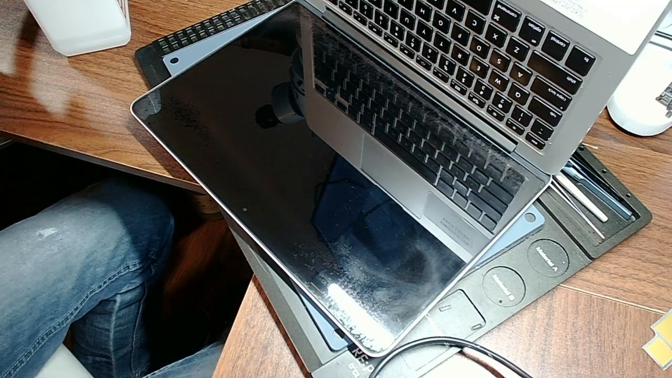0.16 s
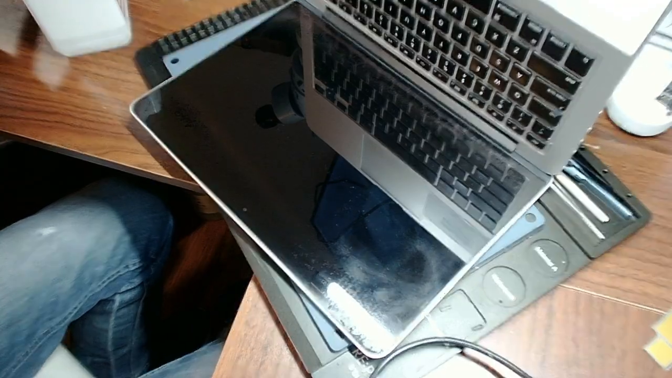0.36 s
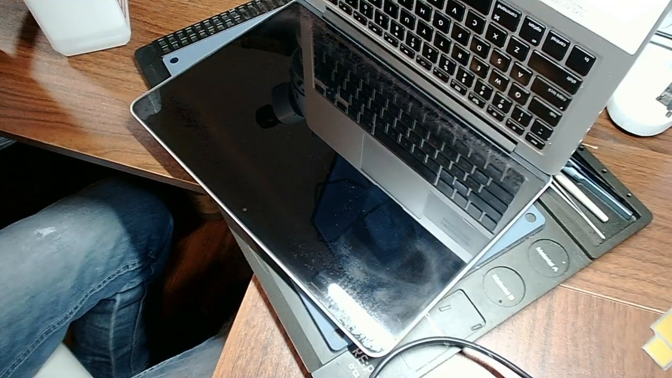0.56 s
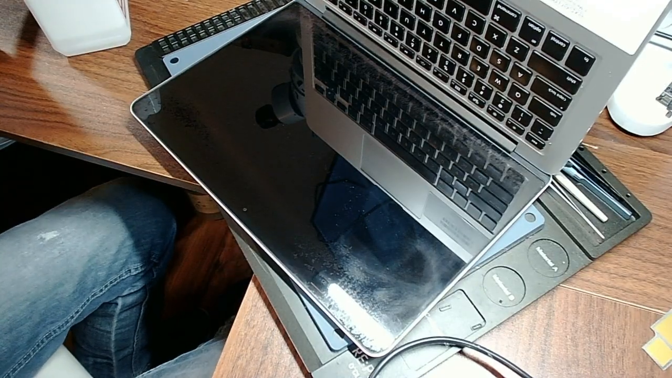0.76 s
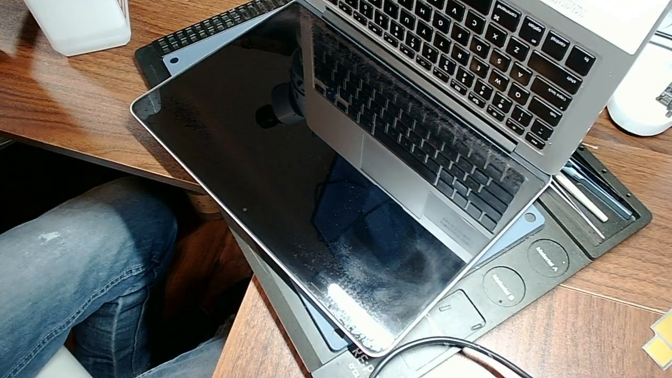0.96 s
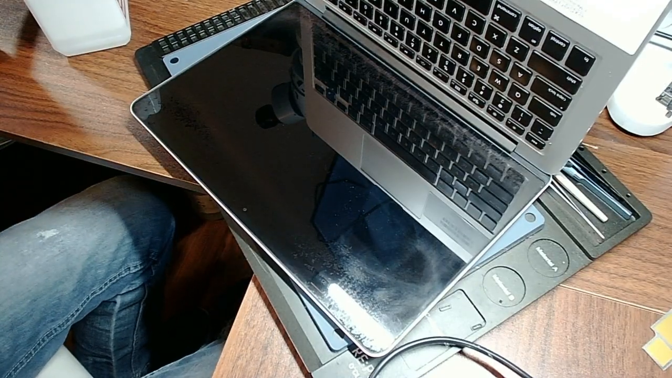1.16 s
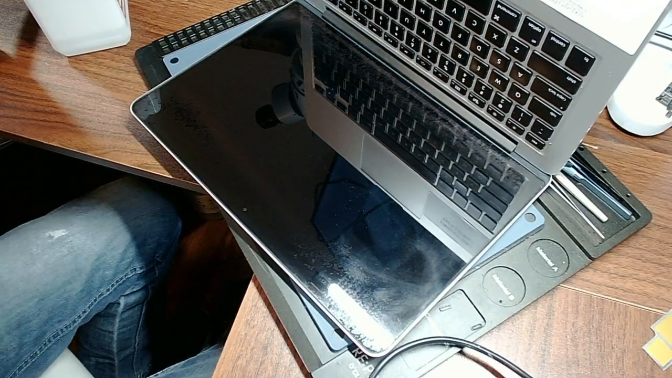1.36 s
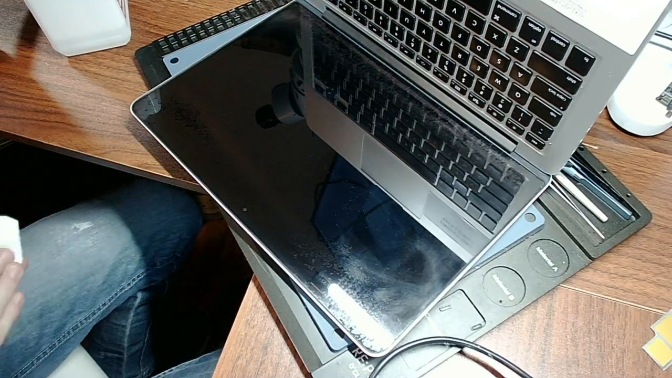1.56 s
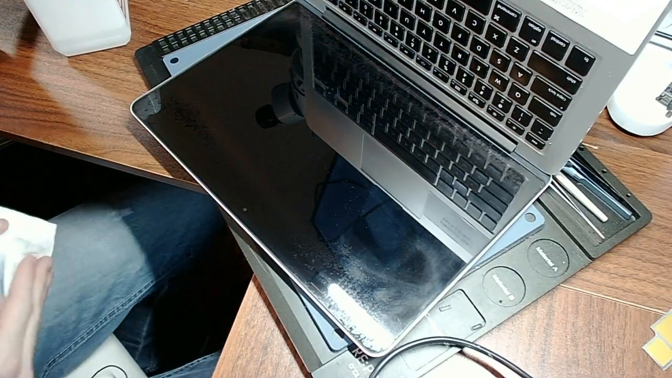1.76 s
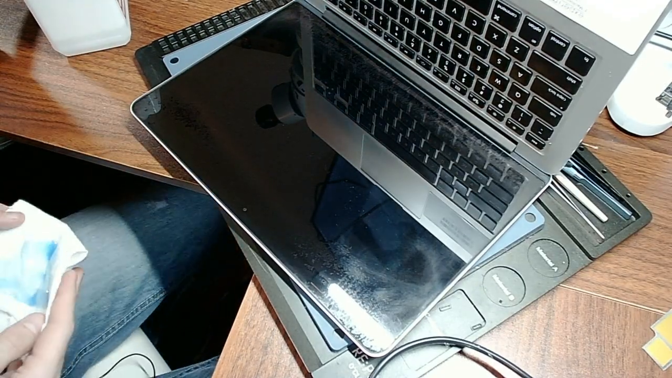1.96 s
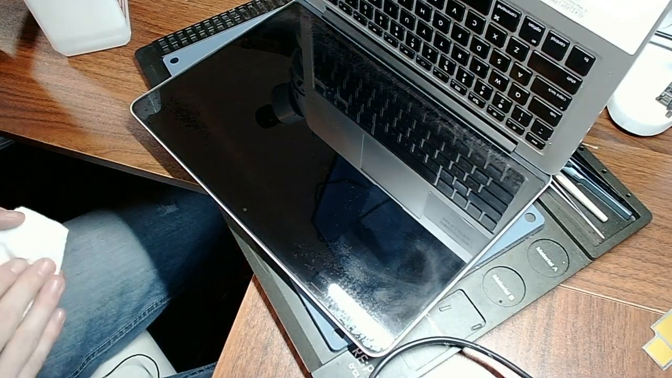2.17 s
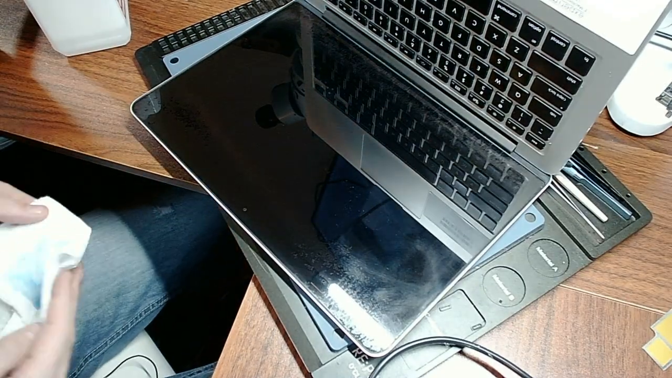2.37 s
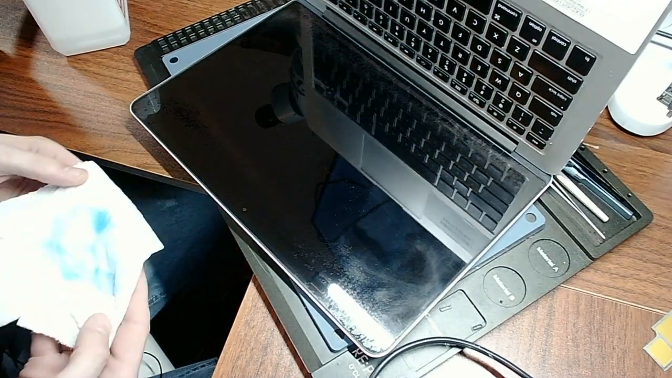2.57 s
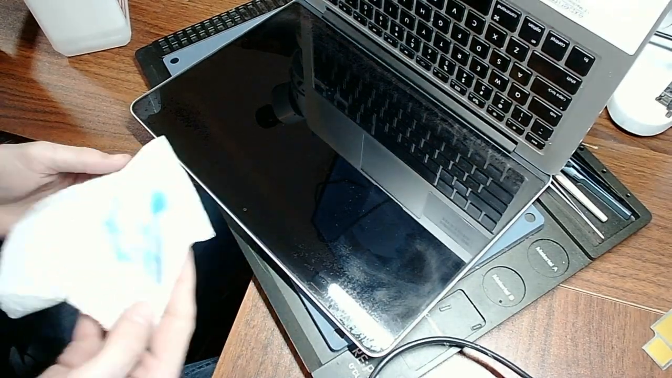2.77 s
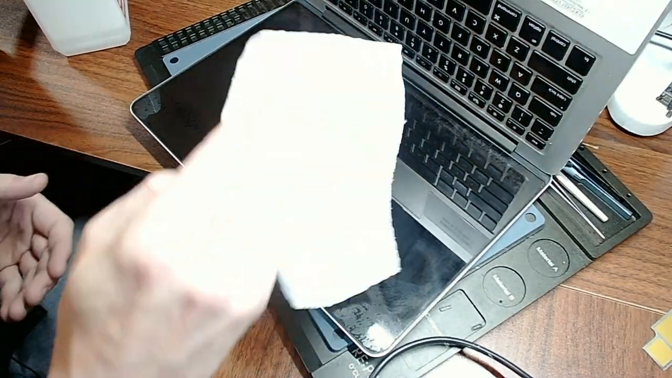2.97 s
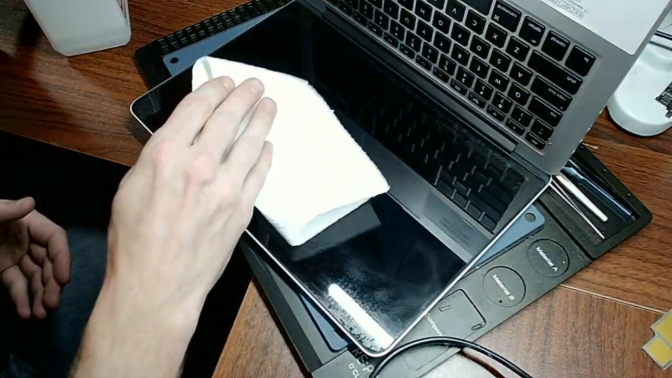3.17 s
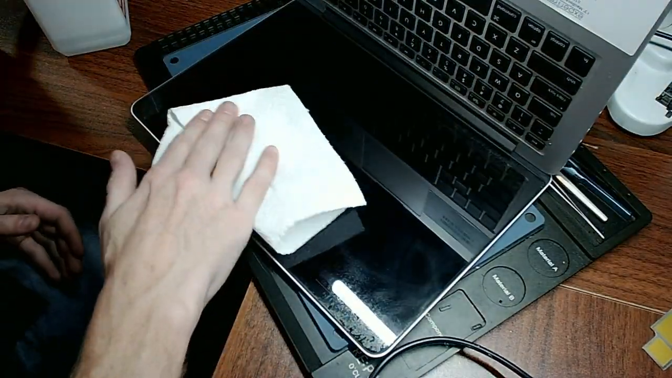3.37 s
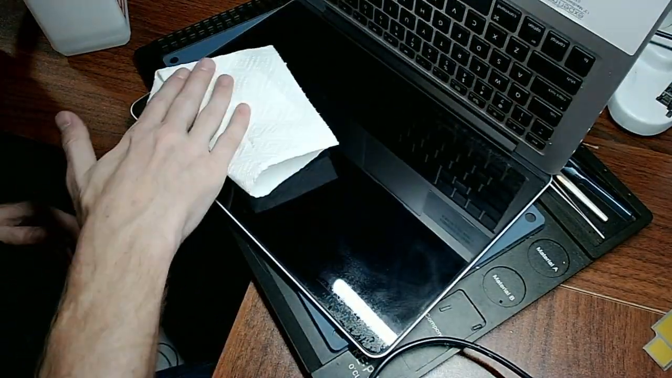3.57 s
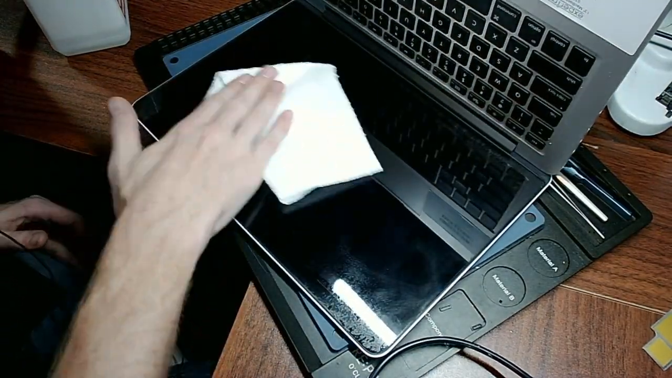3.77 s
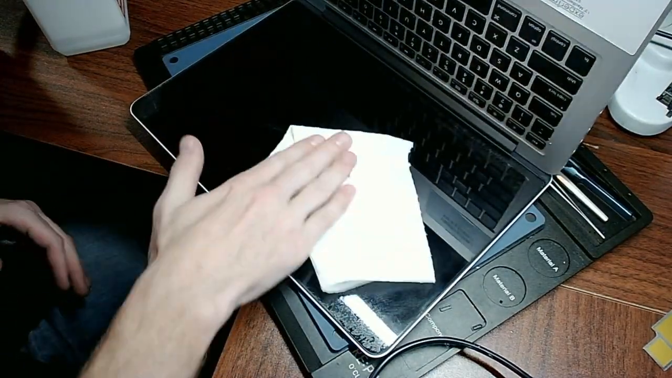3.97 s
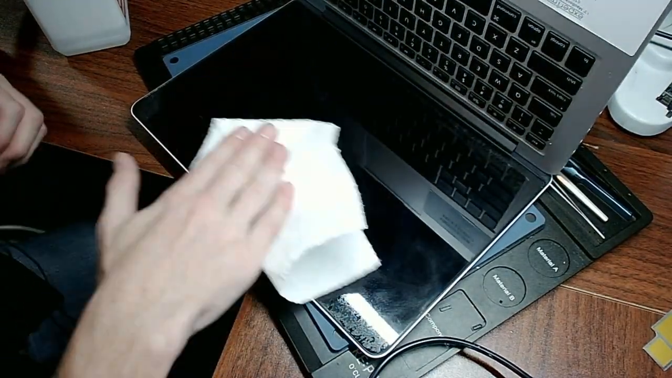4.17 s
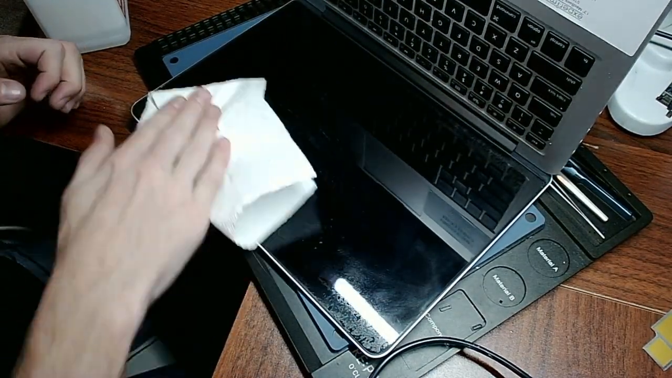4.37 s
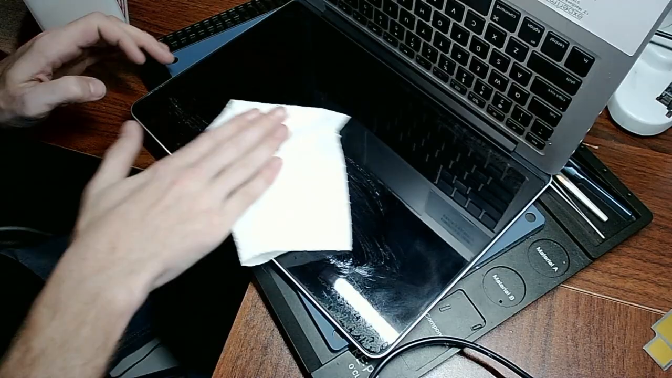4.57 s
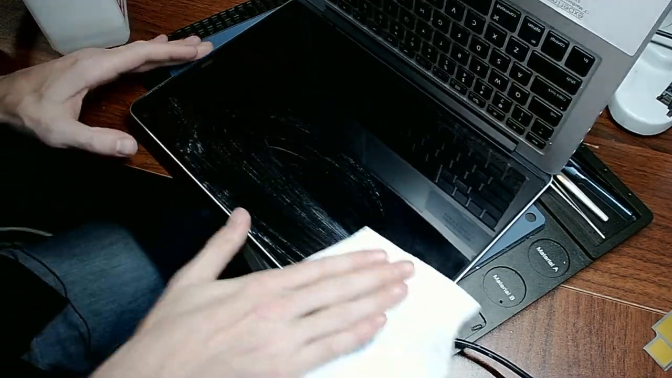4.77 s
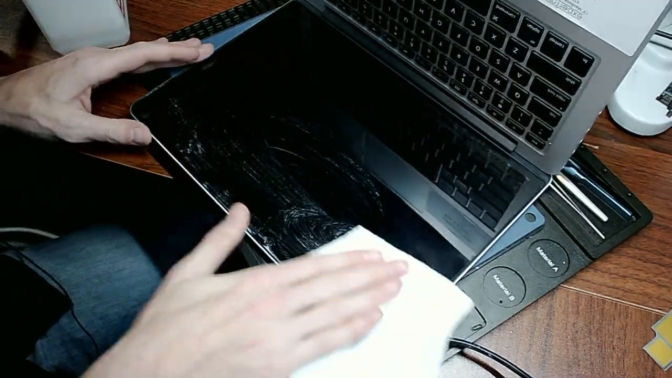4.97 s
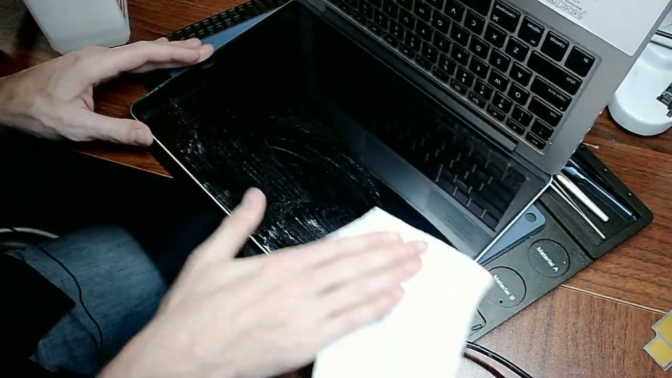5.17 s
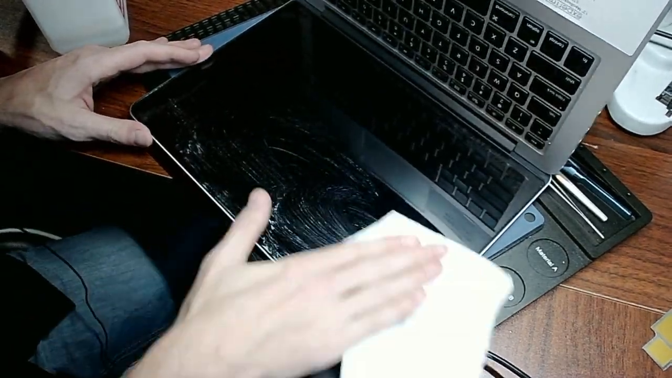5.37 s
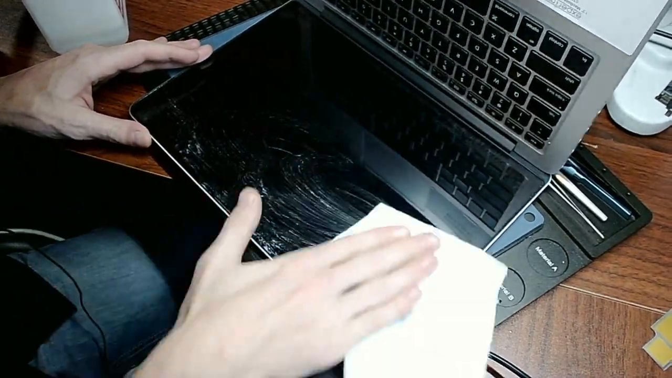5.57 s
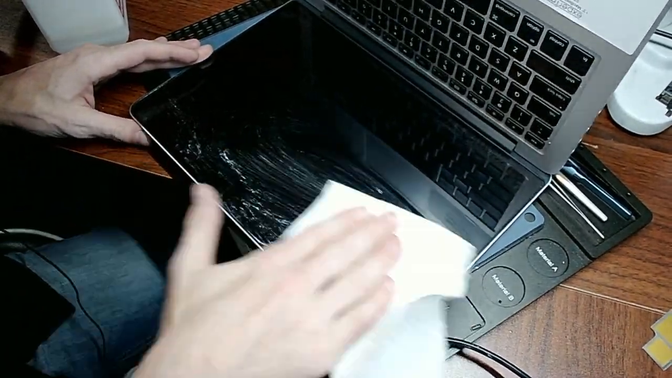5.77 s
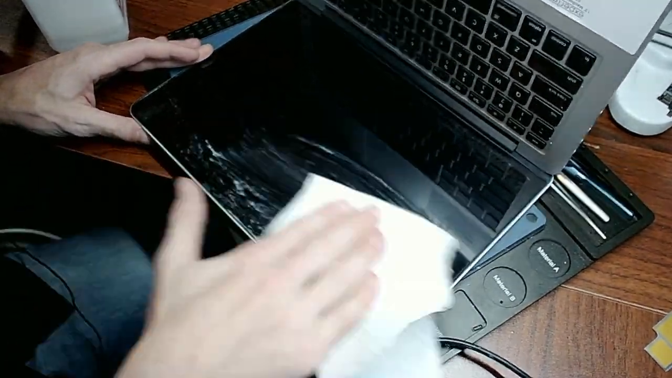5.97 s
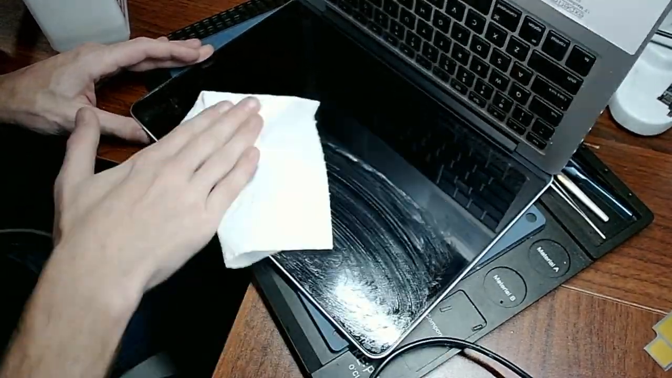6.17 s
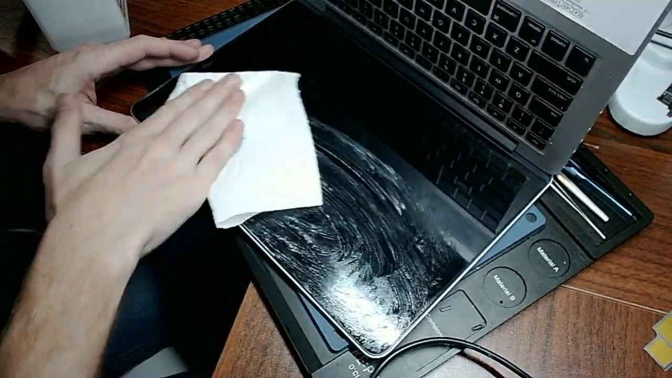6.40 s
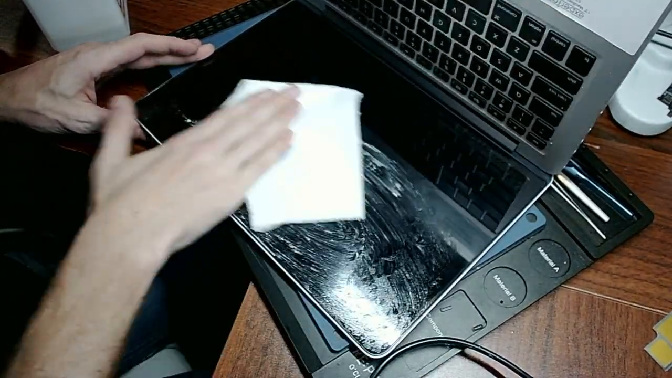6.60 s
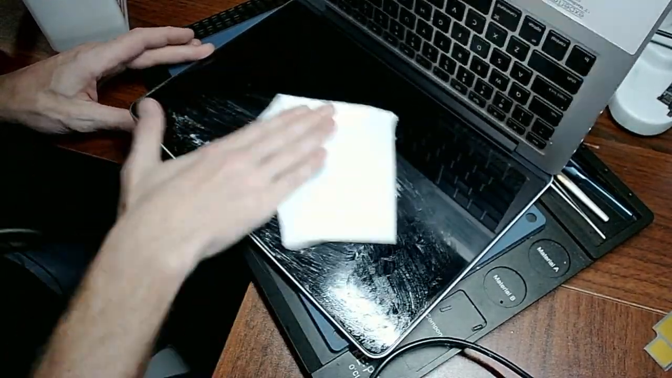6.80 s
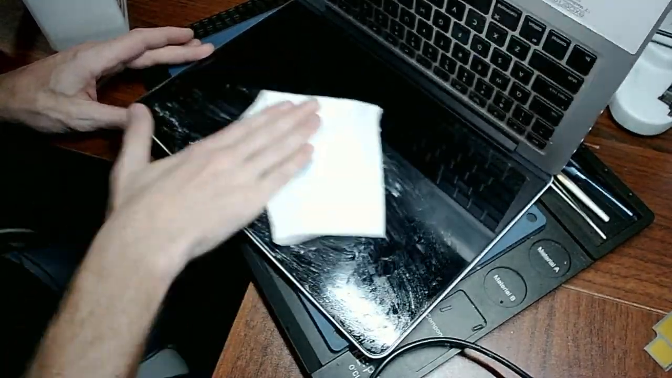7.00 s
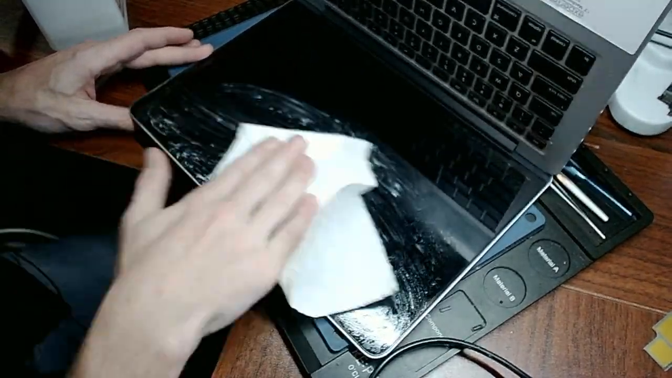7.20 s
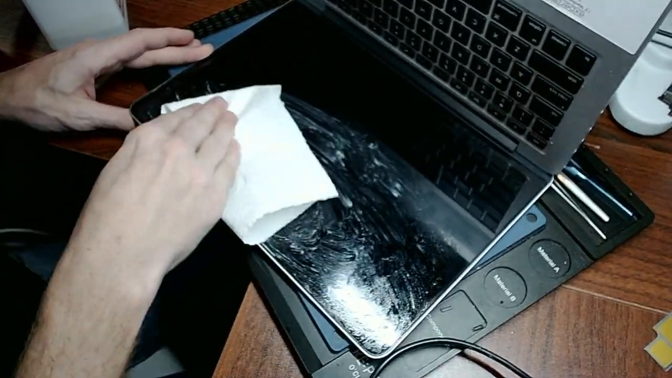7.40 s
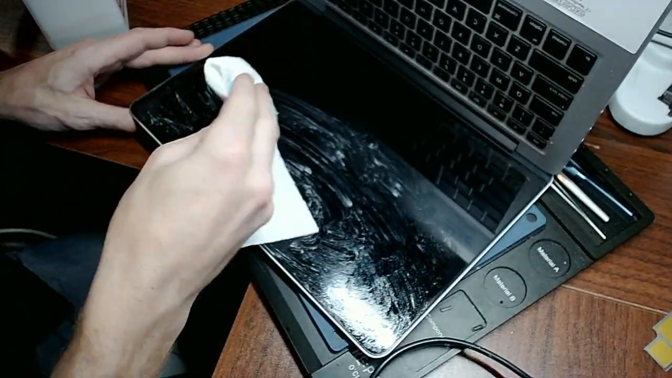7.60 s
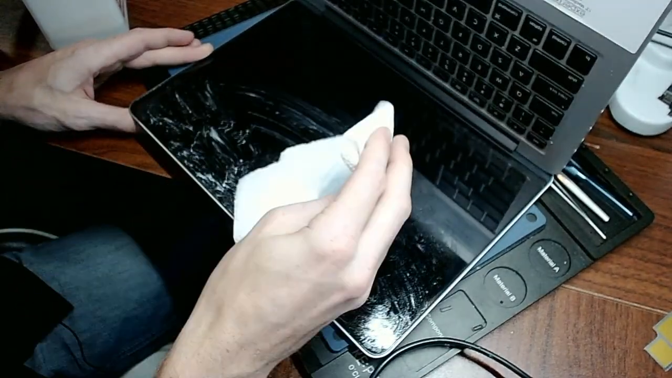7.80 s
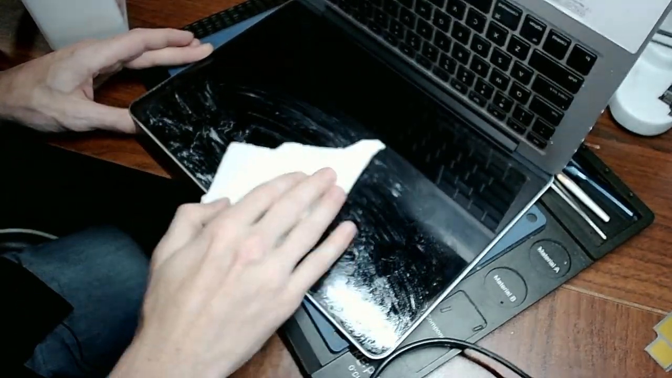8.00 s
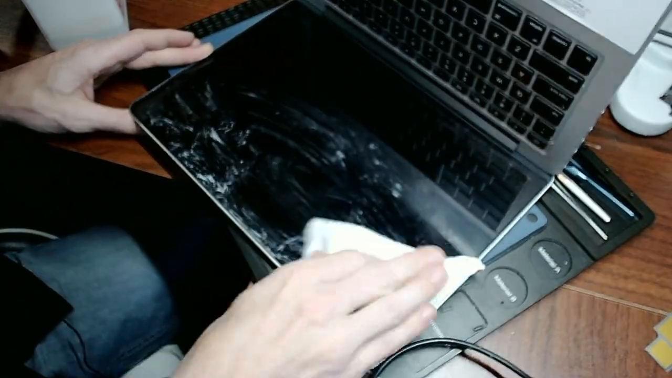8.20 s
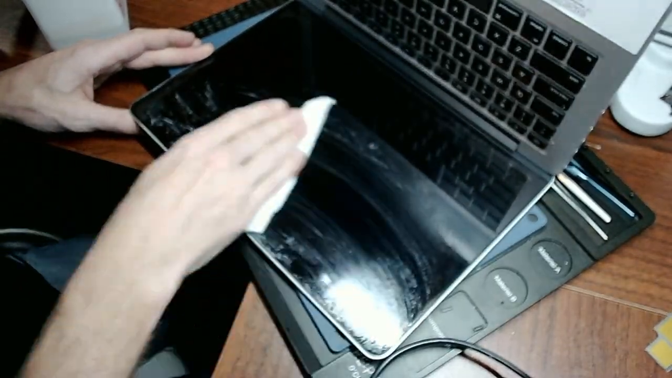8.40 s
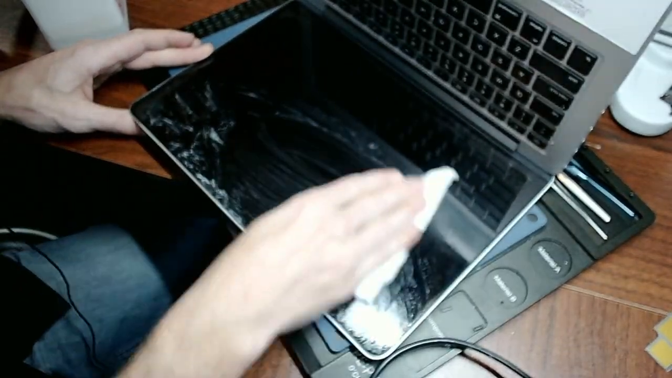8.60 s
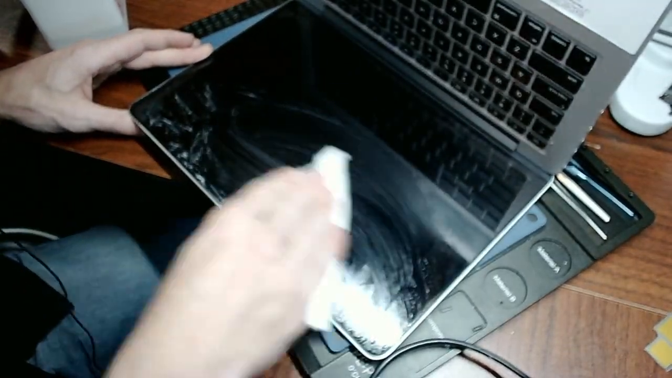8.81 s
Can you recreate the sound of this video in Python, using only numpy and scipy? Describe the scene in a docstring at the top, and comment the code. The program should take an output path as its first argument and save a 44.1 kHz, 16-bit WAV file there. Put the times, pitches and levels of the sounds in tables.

```python
"""Something is set down on a wooden desk; a paper towel is picked up, unfolded and rubbed over a laptop screen.
The towel is made of tiny random slips, coloured as fibre hiss and scrubbing; creases are short bursts of noise.
The damp paper squeaks with unsteady notes, the desk rings in fading tones and the laptop ticks under the hand.
The arm pushes slow waves of air at a close microphone, over a steady hiss and the short tail of a small room."""
import sys
import numpy as np
from scipy import signal
from scipy.fft import rfft, irfft
from scipy.io import wavfile
from scipy.ndimage import uniform_filter1d

SR = 44100
rng = np.random.default_rng(int(sys.argv[2]) if len(sys.argv) > 2 else 0)


def waveform_to_disk(signal):
    """Save audio, clipped to [-1, 1], as 16-bit WAV at the path in sys.argv[1]."""
    frames = np.transpose(np.atleast_2d(signal))
    scaled = np.clip(frames, -1, 1) * 32767
    samples = np.round(scaled).astype(np.int16)
    wavfile.write(sys.argv[1], SR, samples)


N = 390285
TIME = np.arange(N) / SR
# the fast scrubbing: a firm push, then a lighter pull back, at an even pace
SCRUB_START_S, SCRUB_PERIOD_S, SCRUB_COUNT = 5.565, 0.239, 6


def undb(db):
    """Decibels to gain."""
    return 10 ** (np.asarray(db) / 20)


def unit(x):
    """Scale to an rms (average strength) of 1."""
    return x / np.sqrt(np.mean(x ** 2) + 1e-18)


def curves(table):
    """Join the points of each table column with straight lines, giving a value at every sample."""
    s, *columns = np.transpose(table)
    return [np.interp(TIME, s, column) for column in columns]


def colour(x, points):
    """Filter by a (frequency [Hz], level [dB]) spectrum, then scale to rms 1."""
    hz, db = np.transpose(points)
    freq = np.maximum(np.fft.rfftfreq(N, 1 / SR), 1)
    gain = undb(np.interp(np.log(freq), np.log(hz), db))
    return unit(irfft(rfft(x) * gain, N))


def lowpass(x, hz, order=2):
    """Soften the sound above hz."""
    return signal.sosfilt(signal.butter(order, min(hz, SR / 3), fs=SR, output="sos"), x)


def resonate(x, hz, q):
    """Favour one broad band of pitches around hz; a higher q makes it narrower."""
    hz = min(hz, SR / 3)
    b, a = signal.iirpeak(hz, max(q, 3 * hz / SR), fs=SR)
    return signal.lfilter(b, a, x)


def walk(rate, size=N):
    """A smooth random curve that changes about rate times a second, with a spread near 1."""
    k = max(int(SR / rate), 1)
    held = np.repeat(rng.standard_normal(size // k + 2), k)
    return uniform_filter1d(held, k)[:size] * np.sqrt(3 / 2)


def grains(rate, spread_db, size=N):
    """Tiny slips at random moments, about rate a second, with uneven strengths; rms 1."""
    hit = rng.random(size) < rate / SR
    strength = undb(spread_db * np.minimum(rng.exponential(size=size), 4))
    return unit(hit * rng.standard_normal(size) * strength)


def span(length):
    """Time axis of one event, in seconds."""
    return np.arange(int(length * SR)) / SR


def add(out, s, x):
    """Mix x into out at time s."""
    i = max(int(s * SR), 0)
    out[i:i + len(x)] += x[:max(N - i, 0)]


def floor(hiss_db=-50.0):
    """Steady microphone hiss and room tone: random noise with a fixed colour."""
    # spectrum of the background: (frequency [Hz], level [dB])
    floor_colour = [(30, 18), (70, 8), (170, 1.5), (290, 4), (450, 0), (620, 0), (880, 0.5), (1050, -4),
                    (2500, -8), (4000, -10), (5700, -10.5), (7600, -7.5), (9000, -10), (12000, -14.5),
                    (15500, -17.5)]
    return colour(rng.standard_normal(N), floor_colour) * undb(hiss_db)


def draught(wipes_per_s=2.5, sway_db=17, gust_db=3, swirl_db=3.5):
    """The moving arm pushes slow waves of air at the microphone, with uneven eddies strongest at the crests."""
    # air stirred by the arm: (time [s], level [dB])
    air_table = [(0, -56), (.54, -42), (1.25, -51), (1.65, -43), (2.3, -53.5), (3.1, -45), (3.7, -40),
                 (3.97, -27), (4.4, -38), (5.6, -33), (7.2, -34.5), (7.75, -45.5), (8.25, -39.5),
                 (8.85, -32)]
    # spectrum of the eddies: (frequency [Hz], level [dB])
    air_colour = [(5, 4.5), (12, 0), (19, 13), (35, 0), (60, -14), (85, -21.5), (130, -16), (200, -56),
                  (500, -64)]
    air_db, = curves(air_table)
    scrubbing = (TIME > SCRUB_START_S) & (TIME < SCRUB_START_S + SCRUB_COUNT * SCRUB_PERIOD_S)
    pace = np.where(scrubbing, 1 / SCRUB_PERIOD_S, wipes_per_s)
    sway = np.sin(2 * np.pi * np.cumsum(pace) / SR)
    wave = lowpass(undb(air_db + sway_db) * sway, hz=7.4)
    eddies = colour(rng.standard_normal(N), air_colour) * undb(gust_db * sway + swirl_db * walk(12))
    return wave + undb(air_db) * eddies


def ticks(thud_cycles=3.34, snap_cycles=2.26, soft_hz=3300):
    """The laptop case shifts with a sudden step and a snap, both fading within a few cycles."""
    # dry ticks of the laptop and its stand: (time [s], level before softening [dB], thud pitch [Hz],
    # snap pitch [Hz], snap level against the thud before it is doubled below [dB])
    tick_table = [(.99, -37, 250, 1310, 7.5), (1.117, -35.5, 164, 1930, 11),
                  (1.6186, -26.5, 162, 1800, 1.5), (3.312, -23.5, 190, 1460, 3.5),
                  (3.917, -24, 72.6, 700, -32), (3.924, -17.5, 180, 750, -30),
                  (3.9267, -27, 300, 1850, 17.5), (4.038, -31, 170, 900, -6), (4.041, -23, 82.4, 2187, -8),
                  (4.122, -21.5, 86, 1600, -33), (4.363, -31.5, 140, 1000, -43),
                  (4.445, -33, 157, 1700, -25), (4.911, -33.5, 150, 1300, 5),
                  (5.534, -28.5, 148, 1200, 1.5), (5.734, -27, 124, 1500, -21), (6.142, -34, 132, 1400, 3),
                  (7.252, -40, 118, 700, -5), (7.302, -32, 99, 1300, -15)]
    out, t = np.zeros(N), span(0.05)
    for s, db, thud_hz, snap_hz, snap_db in tick_table:
        # each part falls by 60 dB within its given number of cycles
        thud = np.cos(2 * np.pi * thud_hz * t) * undb(-60 * t * thud_hz / thud_cycles)
        snap = np.sin(2 * np.pi * snap_hz * t) * undb(snap_db - 60 * t * snap_hz / snap_cycles)
        add(out, s, undb(db) * (2 * snap - thud))
    return lowpass(out, soft_hz, order=4)


def desk(rattle_hz=600, rattle_db=-14, rattle_t60=0.13, contact_db=-12, contact_t60=0.0094,
         slip_scatter=0.13, flesh_hz=200):
    """Knocks and the juddering towel both ring the desk top; loose things on it rattle briefly."""
    # ringing tones of the desk: (pitch [Hz], level [dB], time to fall by 60 dB [s])
    desk_tones = [(77.8, -1, 0.11), (118.6, 1.5, 0.16), (220.5, -15, 0.19), (259, -10, 0.12),
                  (352, -11, 0.13), (421, -12.5, 0.17), (480, -19.5, 0.21), (797, -21, 0.12),
                  (923, -20.5, 0.1), (1090, -31, 0.083), (1328, -23.5, 0.077), (1640, -40, .1)]
    # knocks on the desk: (time [s], level [dB], hardness of the contact [Hz])
    knock_table = [(0.2832, -18, 1500), (.298, -22.5, 1100), (.314, -32, 600), (0.339, -29, 500),
                   (.431, -22, 1690), (0.473, -26, 550), (.855, -50, 400)]
    # the towel drags and judders: (time [s], length [s], slips per second [1/s], level [dB])
    judder_table = [(8.203, 0.048, 72.6, -38), (8.246, 0.05, 123.5, -39.5)]
    t = span(0.5)
    ring = np.zeros(len(t))
    for k, (hz, db, t60) in enumerate(desk_tones):
        # every other tone starts in the opposite direction
        ring += undb(db - 60 * t / t60) * np.sin(2 * np.pi * hz * t) * (-1) ** k
    out = np.zeros(N)
    for s, db, hardness_hz in knock_table:
        rattle = unit(resonate(rng.standard_normal(len(t)), rattle_hz, q=1.1))
        rattle = rattle * undb(rattle_db - 60 * t / rattle_t60)
        contact = unit(lowpass(rng.standard_normal(len(t)), hardness_hz))
        contact = contact * undb(contact_db - 60 * t / contact_t60)
        add(out, s, (ring + lowpass(rattle, 2 * hardness_hz) + contact) * undb(db))
    for s, length, rate, db in judder_table:
        turns = np.cumsum(rate * (1 + slip_scatter * walk(88, size=int(length * SR)))) / SR
        # a slip each time the count passes a whole number
        slips = np.diff(np.floor(turns), prepend=-1)
        # the pressing hand softens each slip and damps the ring
        damped_ring = ring * undb(-60 * t / 0.13)
        shake = lowpass(signal.fftconvolve(slips, damped_ring), flesh_hz, order=4)
        add(out, s, shake / np.std(shake[:len(slips)]) * undb(db))
    return out


def squeaks(glide=0.532, flutter_db=3, second_ratio=1.13, second_db=-10, overtone_db=-27):
    """Stick-slip: the pitch dips as the paper grips, then lifts and turns ragged before it lets go."""
    # squeaks of the damp paper: (time [s], length [s], lowest pitch before wobble [Hz], level [dB])
    squeak_table = [(1.528, 0.029, 618, -44), (1.669, 0.049, 649, -53), (2.013, 0.026, 750, -51.5),
                    (5.383, 0.02, 5300, -46.5), (5.59, .032, 5400, -41.5), (5.828, 0.031, 4910, -38),
                    (6.061, 0.0387, 4800, -40), (6.301, 0.049, 5200, -44), (6.552, 0.026, 4660, -43.5),
                    (6.77, .024, 5140, -51)]
    out = np.zeros(N)
    for s, length, hz, db in squeak_table:
        u = span(length) / length  # runs from 0 to 1 over the squeak
        pitch = hz * (1 + glide * (u - 0.55) ** 2)
        wobble = 0.025 + 0.05 * u ** 2
        # two fingertips press the paper, each with its own unsteady note
        phases = []
        for _ in range(2):
            unsteady_pitch = pitch * (1 + wobble * walk(1400, size=len(u)))
            phases.append(2 * np.pi * np.cumsum(unsteady_pitch) / SR)
        first, second = phases
        note = np.sin(first) + undb(overtone_db) * np.sin(2 * first)
        note += undb(second_db) * np.sin(second_ratio * second)
        swell = np.sqrt(np.sin(np.pi * u)) * undb(flutter_db * walk(384, size=len(u)))
        add(out, s, unit(swell * note) * undb(db))
    return out


def creases(q=1.74, flutter_db=3, top_hz=11500):
    """A fold gives way quickly and dies away in a fluttering run of tiny slips."""
    # the loudest creases buckling: (time [s], level [dB], length, half of the whole run [s], centre [Hz])
    crease_table = [(0.279, -42.5, 0.029, 4870), (1.111, -48, .006, 7140), (1.356, -44.5, 0.023, 4530),
                    (1.494, -46, 0.036, 6000), (1.598, -31.5, 0.0037, 6700), (1.855, -47, .027, 8000),
                    (2.025, -49.5, 0.046, 5600), (2.152, -52.5, 0.048, 6600), (2.494, -47, 0.013, 7000),
                    (3.152, -40, 0.0037, 6658), (3.315, -49, 0.052, 1860), (3.512, -39.5, .03, 8800),
                    (5.109, -47, .01, 3252), (5.17, -48, .011, 3200), (5.314, -47.5, 0.012, 3380),
                    (5.368, -43, 0.018, 3654), (6.071, -48, 0.021, 1390), (6.752, -46.5, .018, 7500),
                    (6.985, -45, 0.02, 7000), (7.294, -51, 0.052, 1974), (7.843, -52.5, 0.072, 4600),
                    (8.011, -42, 0.013, 8440), (8.158, -38.5, 0.021, 8054), (8.24, -40, 0.035, 7900),
                    (8.337, -41, .01, 7100), (8.651, -48, 0.044, 2420)]
    out = np.zeros(N)
    for s, db, length, hz in crease_table:
        t = span(2 * length)
        slips = rng.standard_normal(len(t)) * undb(flutter_db * walk(970, size=len(t)))
        crackle = resonate(resonate(slips, hz, q), hz, q / 2)
        rise = length / 4
        swell = t / rise * np.exp(1 - t / rise)
        add(out, s, unit(crackle) * swell * undb(db))
    return lowpass(out, top_hz)


def crinkles(hiss_db, rate=9, t60=0.064, centre_hz=7000, q=1.7, crinkle_db=-14):
    """Small folds give way at random as fading bursts of noise, louder where the fibre hiss is louder."""
    t = span(0.1)
    folds = (rng.random(N) < rate / SR) * rng.random(N)
    bursts = signal.fftconvolve(folds, undb(-60 * t / t60))[:N] * rng.standard_normal(N)
    crackle = resonate(resonate(bursts, centre_hz, q), centre_hz, q)
    return unit(crackle) * undb(hiss_db + crinkle_db)


def moves(attack_s=0.055, release_s=0.072, sag_db_per_s=9.5):
    """Fibre hiss and scrubbing in dB: every move swells, sags a little while it lasts and dies away."""
    # single moves of the towel, unfolding and then wiping; levels are before the swell and sag:
    # (time [s], length [s], fibre hiss [dB], scrubbing [dB])
    stroke_table = [(0.688, 0.26, -58, -49), (0.98, 0.11, -62, -49.5), (1.096, 0.33, -48.5, -52),
                    (1.434, 0.18, -51.5, -52), (1.573, 0.095, -46.5, -47.5), (1.741, 0.074, -54, -45.5),
                    (1.832, 0.022, -46.5, -44.5), (1.947, 0.065, -63, -51.5), (2.14, 0.02, -60, -48),
                    (2.27, .06, -49.5, -48), (2.384, 0.4, -55, -51), (2.73, 0.085, -51.5, -50),
                    (3.152, 0.029, -46.5, -47), (3.276, 0.097, -46.5, -49), (3.387, 0.092, -57, -69),
                    (3.506, .13, -47, -62), (3.721, 0.13, -45.5, -63), (4.018, 0.023, -47, -48),
                    (4.07, .06, -50, -68), (4.326, 0.061, -52.5, -59), (4.487, 0.13, -54.5, -49.5),
                    (4.605, 0.2, -51.5, -53), (4.888, 0.066, -50, -50), (5.093, .11, -52.5, -52),
                    (5.305, 0.091, -49.5, -47.5), (6.634, 0.053, -50, -50.5), (7.038, 0.068, -52, -51),
                    (7.306, 0.049, -49.5, -52), (7.335, 0.14, -47.5, -53.5), (7.492, 0.026, -45.5, -48),
                    (7.707, 0.023, -53.5, -53), (7.813, 0.039, -49, -53.5), (7.914, 0.052, -48.5, -47.5),
                    (7.994, 0.021, -51, -57), (8.07, 0.037, -51, -57), (8.182, 0.084, -45.5, -41),
                    (8.325, 0.063, -46.5, -48), (8.415, 0.072, -44.5, -45.5), (8.516, 0.23, -47, -49),
                    (8.798, 0.062, -50, -44.5)]
    # one cycle of the fast scrubbing: (delay [s], length [s], fibre hiss [dB], scrubbing [dB])
    scrub_cycle = [(0, 0.032, -49, -49.5), (0.08, 0.035, -58, -54)]
    fast = []
    for k in range(SCRUB_COUNT):
        for delay, length, hiss, scrub in scrub_cycle:
            fast.append((SCRUB_START_S + k * SCRUB_PERIOD_S + delay, length, hiss, scrub))
    # a faint steady rustle lies under the moves, with a gap from 2.88 to 3.14 s
    gap_start_s, gap_end_s, rustle_hiss_db, rustle_scrub_db = 2.88, 3.14, -58, -60
    rustling = (TIME < gap_start_s) | (TIME > gap_end_s)
    power = np.outer(undb([rustle_hiss_db, rustle_scrub_db]) ** 2, rustling) + 1e-12
    for s, length, *levels in stroke_table + fast:
        t = span(attack_s / 2 + length + release_s)
        swell = np.minimum(t / attack_s, 1)
        fade = np.minimum((t[-1] - t) / release_s, 1)
        shape = swell * fade * undb(-sag_db_per_s * t)
        for layer, db in zip(power, levels):
            add(layer, s - attack_s / 2, (shape * undb(db)) ** 2)
    return 10 * np.log10(power)


def towel(fibre_rate=14000, scrub_rate=4500, patchy_db=1.58, pressure_db=0.93,
          pivot_hz=6500, tilt_db=-7, tilt_slope=0.35):
    """Fibres flick and scrape the surface; the embossed paper grips in patches and sounds duller when pressed."""
    # spectra of the fibre hiss and of the scrubbing: (frequency [Hz], level [dB])
    fibre_colour = [(1500, -21), (3500, -12.5), (4900, -8.5), (6200, -8.5), (7600, 2.5), (8800, 3),
                    (10500, -2), (13000, -11.5), (16000, -17)]
    scrub_colour = [(80, 9), (170, 1), (280, 0), (550, 3.5), (800, -2), (1250, -3.5), (1600, -5.5),
                    (2000, -4), (2600, -10), (3400, -8.5), (4500, -20.5), (7000, -62)]
    hiss_db, press_db = moves()
    bright_db = np.clip(tilt_db + tilt_slope * (hiss_db - press_db), -15, 0)
    grip_db = patchy_db * walk(70) + pressure_db * walk(18)
    fibres = colour(grains(fibre_rate, spread_db=-1.0), fibre_colour)
    # split at pivot_hz: a duller sound has more below it and less above
    soft = signal.sosfiltfilt(signal.butter(3, pivot_hz, fs=SR, output="sos"), fibres)
    sharp = fibres - soft
    fibres = (soft * undb(-bright_db) + sharp * undb(bright_db / 2)) * undb(hiss_db + grip_db)
    scrub = colour(grains(scrub_rate, spread_db=2.0), scrub_colour) * undb(press_db + grip_db)
    return fibres + scrub + crinkles(hiss_db)


def glass_echo(x, lag_ms=0.895, roam=0.353, echo_db=-7):
    """The flat glass mirrors the rustle; as the sheet moves, the lag wanders and the colour shifts."""
    lag = lag_ms / 1000 * SR * np.exp(roam * walk(7))  # in samples
    i = np.arange(N)
    echo = undb(echo_db) * np.interp(i - lag, i, x)
    return (x + echo) / np.hypot(1, undb(echo_db))


def room(x, t60, wet_db):
    """The small room adds a short, weak tail of fading noise that falls by 60 dB in t60 seconds."""
    t = span(0.4)
    tail = rng.standard_normal(len(t)) * undb(-60 * t / t60) * (t > 0.004)
    return x + undb(wet_db) * signal.fftconvolve(x, tail / np.linalg.norm(tail))[:N]


def scene():
    """Paper, glass and desk in the room; ticks and air right at the microphone."""
    background = floor() + draught() + ticks()
    desk_in_room = room(desk(), t60=0.32, wet_db=-13.5)
    paper = squeaks() + glass_echo(creases() + towel())
    return (background + desk_in_room + room(paper, t60=0.45, wet_db=-11.5))[None]


def record(dry):
    """The recorder steeply cuts everything above 15700 Hz."""
    return signal.sosfilt(signal.ellip(10, 0.2, 80, 15700, fs=SR, output="sos"), dry)


dry = scene()
out = record(dry)
waveform_to_disk(out)
```